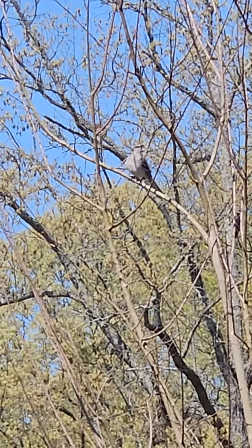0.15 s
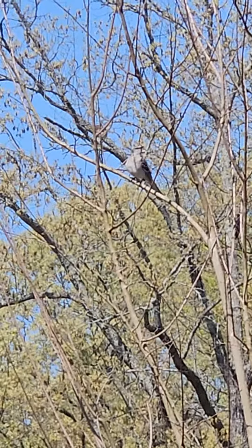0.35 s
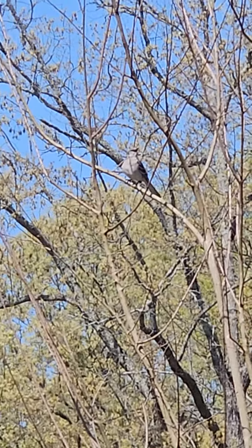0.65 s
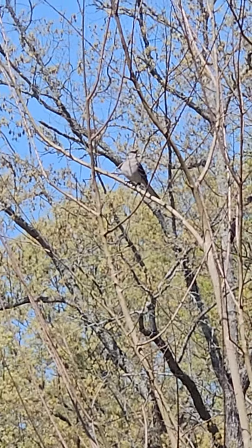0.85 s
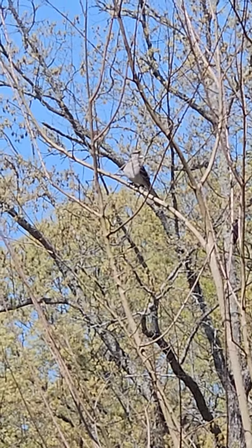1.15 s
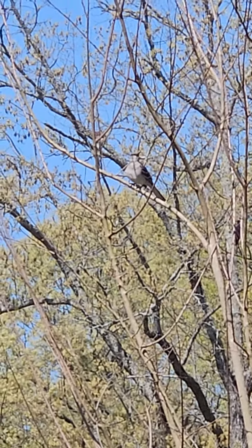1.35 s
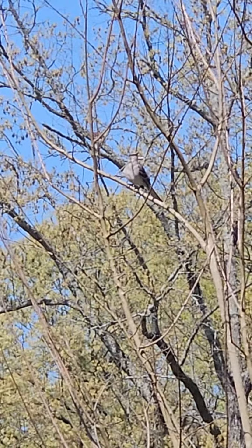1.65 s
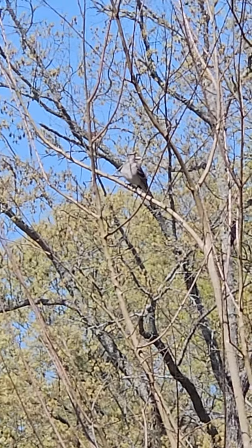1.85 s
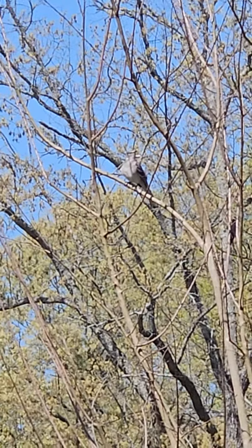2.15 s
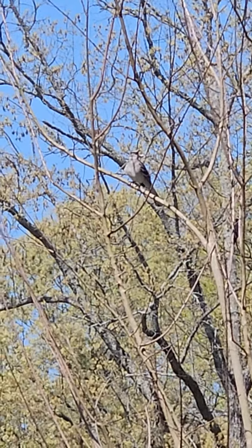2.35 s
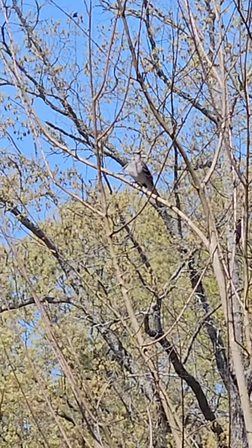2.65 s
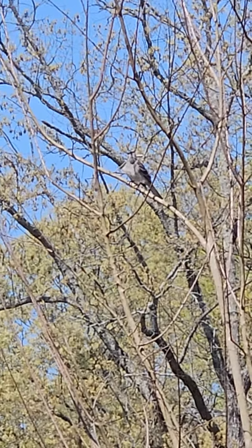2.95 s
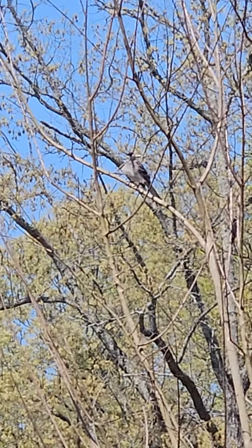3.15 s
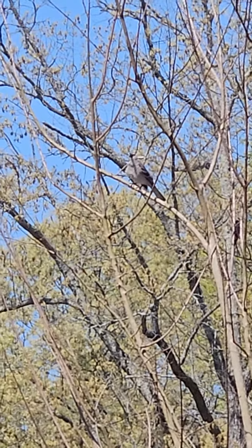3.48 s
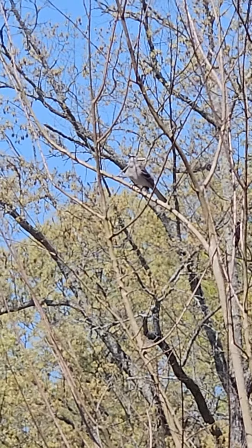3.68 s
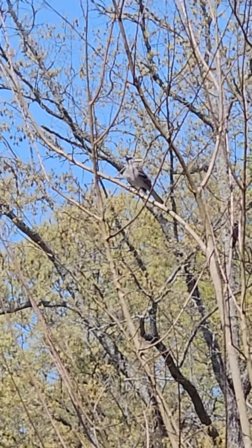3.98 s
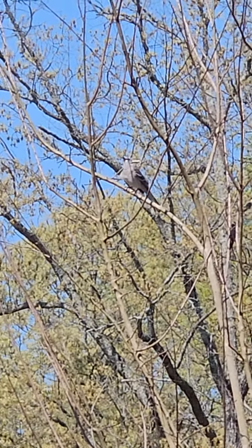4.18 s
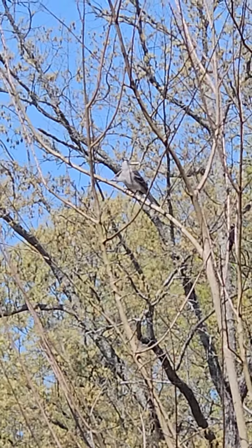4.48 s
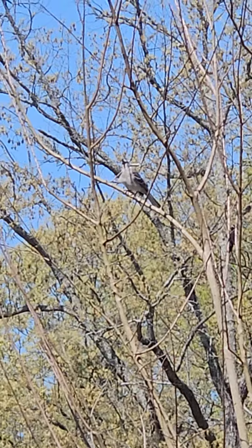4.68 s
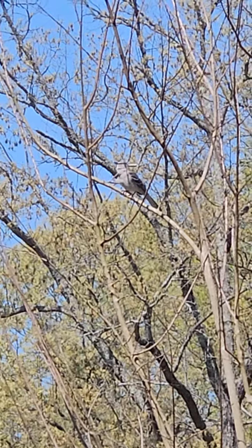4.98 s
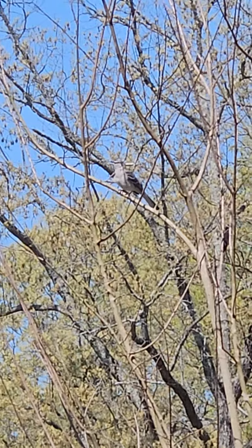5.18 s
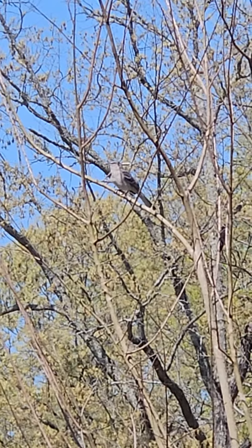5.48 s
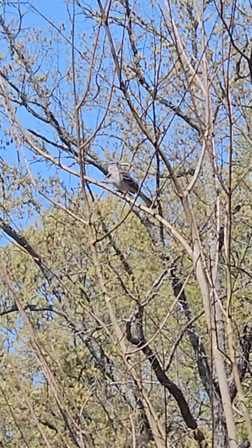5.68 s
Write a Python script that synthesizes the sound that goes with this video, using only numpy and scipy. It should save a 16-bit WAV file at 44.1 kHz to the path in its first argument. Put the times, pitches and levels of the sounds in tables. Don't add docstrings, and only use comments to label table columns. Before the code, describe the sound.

Open woodland, stereo handheld microphone. Quiet road rumble, thin air hiss and a weak wavering machine hum lie under one prominent bird. It gives warbled descending trills separated by pauses and small low two-step notes, then alternates low quavering chirps with sharp high whistles that plunge and settle. Faint distant bird notes and tiny rustles appear. In the second half, low wind buffets hit left and right separately.

```python
import sys
import numpy as np
from scipy import signal
from scipy.fft import rfft, irfft, next_fast_len
from scipy.io import wavfile
from scipy.ndimage import uniform_filter1d, map_coordinates

SR = 44100
rng = np.random.default_rng(int(sys.argv[2]) if len(sys.argv) > 2 else 0)


def unload_audio(sound):
    columns = np.transpose(np.atleast_2d(sound))
    steps = np.round(np.clip(columns, -1, 1) * 32767)
    wavfile.write(sys.argv[1], SR, steps.astype(np.int16))


def field_ratio(decibels):
    return 10 ** (np.asarray(decibels, dtype=float) / 20)


N = 257103


def unit(x):
    return x / np.sqrt(np.mean(x ** 2) + 1e-20)


def along(points, hz):
    f, v = np.transpose(points)
    return np.interp(np.log(hz + 1), np.log(f + 1), v)


def wobble(rate, size=N):
    knots = rng.standard_normal(int(size * rate / SR) + 4)
    return map_coordinates(knots, [np.arange(size) * rate / SR])


def swells(rows, rise_db_per_s, fall_db_per_s):
    s, hold, db = np.transpose(rows)[..., None]
    t = np.arange(N) / SR
    rise_db = rise_db_per_s * np.clip(s - t, 0, 1)
    fall_db = fall_db_per_s * np.clip(t - s - hold, 0, 1)
    return field_ratio(db - rise_db - fall_db)


def rush(spectrum, alike, patchy_db):
    z = signal.stft(rng.standard_normal((2, N)), nperseg=512)[2]
    field = uniform_filter1d(rng.standard_normal(z.shape[1:]), 6, 0)
    field = uniform_filter1d(field, 14, 1)
    pair = signal.istft(z * field_ratio(patchy_db * unit(field)), nperseg=512)[1][:, :N]
    m = next_fast_len(N + 8192)
    hz = np.fft.rfftfreq(m, 1 / SR)
    turn = np.arccos(np.clip(along(alike, hz), -1, 1)) / 2
    weights = np.array([np.cos(turn), np.sin(turn)])
    mid, side = irfft(rfft(pair, m) * field_ratio(along(spectrum, hz)) * weights, m)[:, :N]
    return unit(np.array([mid + side, mid - side]))


# freq_hz, likeness (-1 to 1); the air hiss shares it
LIKENESS = [(60, 0.6), (180, 1), (550, 0.34), (1650, 0.35), (4970, -0.29), (15000, 1)]
# freq_hz, density_db (per Hz)
TYRES = [(88, -11.5), (150, 0), (194, -23), (246, -4), (274, -5), (318, -4.5), (808, -13.5), (1600, -21),
         (2080, -64.5), (3520, -120)]
# freq_hz, density_db (per Hz)
ENGINES = [(12, -25), (20, -18.5), (76, -4), (173, -19), (199, -26.5), (230, -20.5), (300, -43.5),
           (510, -120)]
# start_s, hold_s, level_db
PASSING = [
    (0.0, 3.2, -45.5),
    (.55, 0.053, -42),
    (3.03, 0.18, -41.5),
]


def traffic():
    tyres = field_ratio(-54 - 0.55 * wobble(4.7)) * rush(TYRES, LIKENESS, patchy_db=2.0)
    nearer = swells(PASSING, rise_db_per_s=48, fall_db_per_s=48).max(0)
    level = np.maximum(field_ratio(-45.5), nearer) * field_ratio(1.5 * wobble(7.5))
    return tyres + level * rush(ENGINES, [(50, 0.88)], patchy_db=-0.6)


# start_s, hold_s, level_db
HUM = [(0.0, 0.066, -53), (.3, 0.1, -55), (.65, 0.22, -58.5), (1.05, 0.23, -54.5), (1.55, 0.29, -55.5),
       (2.55, 0.3, -58.5), (3.15, 0.66, -54), (3.9, 0.19, -55), (4.3, 0.19, -46.5), (4.62, 0.15, -53),
       (5.0, 0.075, -57), (5.32, 0.38, -51)]


def machine_hum():
    level = field_ratio(-71.5) + swells(HUM, rise_db_per_s=153, fall_db_per_s=153).sum(0)
    phase = 2 * np.pi * np.cumsum(250 + 2.67 * wobble(18)) / SR
    return level * np.sin(phase) * field_ratio([[-1.5], [1.5]])


# freq_hz, density_db (per Hz)
AIR = [(710, -47), (1200, -28.5), (1690, -14), (2500, 2.5), (5860, -21.5), (8450, -12.5), (9310, -22),
       (9620, -58), (11500, -24.5), (15800, -32)]


def air_hiss():
    return field_ratio(-59) * rush(AIR, LIKENESS, patchy_db=1.5)


# freq_hz, density_db (per Hz)
EARLIER = [(880, -62), (1500, -17), (1590, -16.5), (1890, 4.5), (2620, 5.5), (2750, 11), (2950, -61),
           (3300, -37), (4290, -51), (7260, -120)]


def earlier_phrase():
    t = np.arange(N) / SR
    return field_ratio(-41.0 - 60 * t / 1.05) * rush(EARLIER, [(2000, 0.28)], patchy_db=1.0)


# pitch_hz, level_db, middle_s, half_length_s
INSECTS = [
    (4880, -78.5, 0.4, 0.5),
    (5100, -77, 0.57, 0.068),
    (3160, -74, .29, 0.062),
    (9180, -73.5, 0.063, 0.13),
]


def insects():
    t = np.arange(N) / SR
    total = np.zeros(N)
    for hz, db, middle, half in INSECTS:
        level_db = db + 5.5 + 3 * wobble(12.0) - 9 * ((t - middle) / half) ** 4
        total += field_ratio(level_db) * np.sin(2 * np.pi * hz * t + 0.89 * wobble(40))
    return total


# middle_s, half_length_s, level_db, centre_hz, band_ratio
STIRS = [
    (0.28, 0.027, -63.5, 8350, 3.6),
    (2.23, 0.046, -63, 8000, 2),
    (4.725, 0.13, -54, 1603, 1.33),
    (1.149, 0.24, -53.5, 808, 1.36),
    (1.85, 0.09, -55.5, 782, 1.26),
    (3.933, 0.053, -54, 762, 3.3),
]


def stirs():
    t = np.arange(N) / SR
    total = np.zeros((2, N))
    for middle, half, db, hz, ratio in STIRS:
        band = [(hz / ratio ** 2, -120), (hz / ratio, -25), (hz, 0), (hz * ratio, -25), (hz * ratio ** 2, -120)]
        swell = field_ratio(db) * np.exp(-((t - middle) / half) ** 4)
        total += swell * rush(band, [(hz, .2)], patchy_db=-2.0)
    return total


def add(track, start_s, sound):
    part = track[:, max(round(start_s * SR), 0):][:, :sound.shape[1]]
    part += sound[:, :part.shape[1]]


# freq_hz, density_db (per Hz)
RASP = [(2000, -16), (3500, 5.5), (4700, 7.5), (5900, -9.5), (7000, -6.5), (9000, 2.5), (10000, -60),
        (12000, -6), (14500, -12), (15900, -31.5)]


def sing(track, rows, overtones_db, warble=((0, 0), (6, 360)), rasp_db=-45, glide=0.0011, swing=0.0524,
         jitter=0.0077, edge=0.0017, onset=0, grain_db=1.0, smear=0.15, clear_db_per_s=0, late_db=0,
         late_s=.03, puff_db=-80, dip=0):
    s, *cols = np.transpose(rows)
    t = np.arange(s[0], s[-1], 1 / SR)
    size = len(t)
    age = t - t[0]
    hz, db, pan_db, depth = [np.interp(t, s, c) for c in cols]
    hz = uniform_filter1d(hz, round(glide * SR) + 1, mode="nearest")

    turn = 2 * np.pi * np.interp(t, *np.transpose(warble)) - 0.3 + 0.13 * wobble(31.4, size)
    depth = np.clip(depth, 0, 1) * np.clip((age - .004) / .012, 0, 1)
    shut = (1 - np.cos(turn + .5 * np.cos(turn))) / 2
    leap = (1 - np.cos(turn - 0.3)) / 2
    snap = onset * np.exp(-age / .003)
    bend = swing * depth * leap ** 2.9 - dip * depth * np.sin(turn)
    pitch = hz * (1 + bend + snap + jitter * wobble(148.36, size))
    phase = 2 * np.pi * np.cumsum(pitch) / SR

    tone = (1 - .93 * depth * shut) * np.sin(phase)
    for k, over_db in enumerate(overtones_db, 2):
        late = late_db * (k - 2.5) * np.exp(-age / late_s)
        level = field_ratio(over_db - late + grain_db * wobble(251.2, size)) * (1 - 0.88 * depth * shut)
        partial = np.sin(k * phase + smear * k * wobble(400, size))
        tone += level * partial * (k * pitch < 15900)
    tone *= field_ratio(depth * (2.32 * wobble(199.3, size) + 1.17 * wobble(44.9, size)))

    rasp = field_ratio(along(RASP, np.fft.rfftfreq(size, 1 / SR)))
    air = unit(irfft(rfft(rng.standard_normal(size)) * rasp, size))
    spit = 1 - .6 * depth + 1.6 * depth * shut ** 2
    breath = field_ratio(rasp_db - clear_db_per_s * age) + field_ratio(puff_db - 500 * age)
    voice = np.sqrt(2) * tone + breath * spit * air
    fade = np.clip(np.minimum(age, t[-1] - t) / edge, 0, 1)
    add(track, s[0], voice * field_ratio(db) * fade * field_ratio([pan_db / 2, -pan_db / 2]))


def stamped(shape, start_s, scale, db, pan_db):
    return [(start_s + s, scale * hz, db + rel_db, pan_db, 0) for s, hz, rel_db in shape]


# start_s, length_s, from_hz, to_hz, level_db
FAR = [(2.11, .06, 4700, 4120, -64), (2.2, .13, 3760, 3610, -61), (4.605, .045, 5100, 3900, -61),
       (1.98, .14, 3560, 3340, -60), (3.56, .11, 2280, 2000, -58), (.335, .05, 2050, 1900, -63),
       (.39, .065, 2050, 2320, -63), (.455, .04, 1900, 1860, -61), (1.86, .2, 3960, 3880, -67),
       (.12, .07, 2150, 2320, -61), (4.22, .14, 2850, 2700, -58)]


def far_bird():
    song = np.zeros((2, N))
    for s, length, from_hz, to_hz, db in FAR:
        glide = [(0, from_hz, 0), (length, to_hz, 0)]
        sing(song, stamped(glide, s, 0.98, db, -1), [], edge=0.0094)
    return song


def swaying():
    slow = np.array([wobble(25), wobble(25)])
    quick = np.array([wobble(90), wobble(90)])
    return field_ratio(2.6 * slow + 1.5 * quick)


# freq_hz, t60_s
WOOD = [(1000, 0.98), (2500, 2.49), (4000, 1.34), (8000, 0.98), (15000, 0.18)]


def wood(x, build=0.028):
    hz, t, z = signal.stft(rng.standard_normal((2, 2 * SR)), SR, nperseg=256)
    shape = field_ratio(-60 * t / along(WOOD, hz)[:, None]) + 4.53 * field_ratio(-60 * t / 0.34)
    tail = signal.istft(z * shape * (1 - np.exp(-t / build)), SR, nperseg=256)[1]
    tail /= np.linalg.norm(tail[0])
    return swaying() * signal.fftconvolve(x.mean(0)[None], tail, axes=1)[:, :N]


# start_s, pitch_hz, level_db, left_minus_right_db
TRILLS = [
    [(.571, 4220, -30.5, -2), (.595, 4074, -22.5, 1), (.615, 3850, -16.5, -7), (.66, 3620, -16, 1),
     (.70, 3423, -24.5, -3), (.775, 3260, -20.5, 1), (.85, 3150, -22.5, -1.5), (.94, 3114, -23.5, 0),
     (.965, 3370, -37.5, -10.5)],
    [(1.352, 4160, -34, 3), (1.372, 3900, -20.5, -7), (1.39, 3684, -12, 0), (1.505, 3500, -13.5, 1.5),
     (1.55, 3403, -22.5, -6.5), (1.595, 3180, -15, 2.5), (1.685, 3097, -24, -1), (1.703, 2984, -20, 4),
     (1.73, 3010, -38.5, -8)],
    [(2.346, 4260, -41, -7), (2.365, 3980, -17.5, -4.5), (2.40, 3603, -17.5, -2), (2.452, 3550, -13.5, -2),
     (2.47, 3434, -22.5, -3), (2.54, 3264, -19, 1), (2.66, 3025, -19, -2.5), (2.725, 2949, -18, 0),
     (2.815, 3153, -28.5, -2)],
    [(3.234, 4140, -31.5, 7.5), (3.255, 4214, -16, -3), (3.275, 3884, -17, -11), (3.30, 3614, -13, -0.5),
     (3.345, 3542, -12.5, 3), (3.38, 3430, -17.5, -2), (3.412, 3270, -16, 0), (3.555, 2954, -20, 1.5),
     (3.595, 2863, -25, -6)],
]
# start_s, swells_so_far
WARBLE = [
    [(.565, -2), (.597, 0), (.757, 10), (.865, 16), (.97, 22)],
    [(1.351, -2), (1.388, 0), (1.53, 8), (1.703, 18), (1.738, 20)],
    [(2.346, -1), (2.674, 18), (2.743, 22), (2.782, 24), (2.826, 26)],
    [(3.232, -1), (3.25, 0), (3.273, 1), (3.41, 9), (3.558, 18), (3.611, 21)],
]
TRILL_AIR_DB = [-32, -43, -31, -41]
TRILL_VOICE = [-19.5, -33, -30.5]


def trills(song):
    for rows, warble, air_db in zip(TRILLS, WARBLE, TRILL_AIR_DB):
        sing(song, [(*row, .97) for row in rows], TRILL_VOICE, warble, rasp_db=air_db, puff_db=-20.5,
             dip=0.027, swing=.12, onset=0.052, jitter=0.01, glide=0.0048, edge=0.0021, smear=0.55)


# freq_hz, level_db
TWIGS = [(1500, -16), (2500, -14), (3200, -9), (8000, -7), (15000, -6)]


def trunks(x, spread=0.0076):
    t = np.arange(SR // 8) / SR
    answer = rng.standard_normal((2, len(t))) * np.exp(-t / (2 * spread)) * np.clip(t / 0.011, 0, 1)
    answer /= np.linalg.norm(answer[0])
    m = next_fast_len(N + SR)
    scatter = field_ratio(along(TWIGS, np.fft.rfftfreq(m, 1 / SR)))
    return irfft(rfft(x, m) * rfft(answer, m) * scatter, m)[:, :N]


# freq_hz, left_lead_rad
PORTS = [(0, -5.5), (3100, 1.57), (3700, 0.87), (4820, 2), (5250, -7.5), (6120, 10.5), (7750, 7.5),
         (8870, 14.5), (9130, -2), (9560, 1), (10900, 9), (12800, 16), (13900, 17), (15500, 16)]


def ports(x):
    m = next_fast_len(N + 8192)
    lead = along(PORTS, np.fft.rfftfreq(m, 1 / SR))
    return irfft(rfft(x, m) * np.exp(.5j * np.array([lead, -lead])), m)[:, :N]


# freq_hz, gain_db, left_minus_right_db
BOUNCE = [(1705, 5, -1), (1817, 3, -7), (1930, 4.5, 0), (2176, 3, -7), (2200, 0.5, -13.5),
          (2600, 3, 7.5),
          (3000, -2, -1.5), (3250, -1.5, 1.5), (3420, -4, -3), (3550, 2, 3), (3900, 2, -12),
               (4080, -9, -5), (4270, 1, 4), (4640, 2, -11)]


def heard(s, hz, db, depth):
    bounce = np.array(BOUNCE)
    gain_db = along(bounce[:, :2], hz)
    pan_db = along(bounce[:, ::2], hz)
    return np.transpose([s, hz, db + gain_db, pan_db, depth + 0 * s])


# start_s, pitch_hz, level_db
STEPS = [
    [(1.006, 2386, -53), (1.022, 2368, -28.5), (1.042, 2338, -27), (1.074, 2327, -22.5),
     (1.081, 2166, -46.5), (1.088, 2180, -38), (1.112, 2380, -40), (1.122, 2300, -47)],
    [(1.114, 2020, -58), (1.122, 1909, -36), (1.134, 1834, -36.5), (1.153, 1810, -27.5),
     (1.18, 1833, -27.5), (1.194, 1780, -41)],
    [(2.87, 2284, -51), (2.879, 2330, -39.5), (2.889, 2408, -26.5), (2.927, 2342, -23.5),
     (2.943, 2309, -28.5), (2.953, 2427, -20.5), (2.962, 2340, -55.5), (2.972, 2285, -33.5),
     (2.98, 2400, -46)],
    [(2.978, 2260, -46), (2.983, 2130, -35.5), (2.991, 1930, -29), (3.012, 1888, -36.5),
     (3.034, 1864, -30.5), (3.05, 1885, -32)],
]
UPPER_VOICE = [-25, -27, -43.5, -48, -51, -34]
LOWER_VOICE = [-16.5, -33.5, -30, -47, -33, -34]


def two_steps(song):
    for rows, voice in zip(STEPS, 2 * [UPPER_VOICE, LOWER_VOICE]):
        s, hz, db = np.transpose(rows)
        sing(song, heard(s, hz, db, .1), voice, rasp_db=-40.0, glide=0.0027, jitter=0.0045,
             smear=0.069, edge=0.0018)


# start_s, from_hz, to_hz, level_db
SAGS = [
    (1.198, 1958, 1494, -30),
    (3.051, 1836, 1684, -26),
    (3.919, 1795, 1645, -34),
    (4.236, 3800, 3520, -17.5),
    (4.531, 1840, 1667, -29.5),
    (5.191, 1850, 1687, -30.5),
    (5.515, 3950, 3460, -29.5),
]
LOW_VOICE = [-15.5, -30.5, -30, -57.5, -33.5, -31.5]


def sags(song):
    for s, from_hz, to_hz, db in SAGS:
        voice = LOW_VOICE[:2] if from_hz < 3000 else [-34]
        fall = [(0, from_hz, 0.5), (.02, to_hz, -14.5)]
        sing(song, stamped(fall, s, 1, db, -2), voice, edge=.005)


# start_s, hold_s, buffet_db, left_minus_right_db, sharpness_db
GUSTS = [(3.595, 0.065, -32.5, -2, -32), (3.737, 0.067, -12.5, -22, -16.5), (3.868, 0.04, -16.5, 12, -25),
         (3.966, 0.15, -20.5, 18, -9), (4.202, 0.011, -11, -5.5, -6), (4.228, 0.026, -24, -1, 0.5),
         (4.247, .015, -23, 4, -8), (4.32, 0.003, -16, -12, -7), (4.408, 0.0078, -13.5, -8, -24.5),
         (4.574, 0.027, -32.5, 10, -9), (4.647, 0.036, -29.5, -23, -21), (4.91, 0.11, -38, -10, -16),
         (5.057, 0.15, -42, 2, -5.5), (5.31, 0.014, -21.5, 29, -21), (5.338, 0.067, -37.5, 10, -6),
         (5.51, 0.013, -40, -6, -14)]
# freq_hz, density_db (per Hz)
BUFFET = [(47, -41), (80, 0), (139, -4.5), (227, -18.5), (413, -47), (500, -65.5), (650, -87.5),
          (1100, -120)]
# freq_hz, likeness (-1 to 1)
GUST_ALIKE = [(50, -.1)]


def wind():
    *_, pan_db, sharp_db = np.transpose(GUSTS)
    power = swells(np.array(GUSTS)[:, :3], rise_db_per_s=352, fall_db_per_s=298.5) ** 2
    ratio = field_ratio([pan_db, -pan_db]) ** 2
    share = ratio / (1 + ratio)
    lumps = field_ratio(2.8 * np.array([wobble(16), wobble(22)]))
    thud = [(15, -33.5), (30, -17.5), (55, -9.5), (90, -19.0), (130, -50), (300, -120)]
    deep = rush(thud, GUST_ALIKE, patchy_db=0.0)
    sharp = rush(BUFFET, GUST_ALIKE, patchy_db=4.0)
    deep_level = 0.68 * np.sqrt(share @ power)
    sharp_level = np.sqrt(share * field_ratio(2 * sharp_db + 2.5) @ power)
    return lumps * (deep_level * deep + sharp_level * sharp)


# start_s, level_db
PICKUPS = [
    (3.759, -55),
    (4.374, -53),
    (5.03, -55),
    (5.693, -57.5),
]
# after_start_s, pitch_hz, level_db
PICKUP = [(0, 1260, -3), (.016, 1428, 11.5), (.022, 1600, 5), (.027, 1940, 22.5)]
CROAK_VOICE = [1, -50, -27]


def pickups(song):
    for s, db in PICKUPS:
        sing(song, stamped(PICKUP, s, 1, db, -2), CROAK_VOICE, rasp_db=-29.5, jitter=0.024)


def moments(start, end):
    return np.arange(start, end, .001)


def envelope(t, length, attack, start_db, fade_db_per_s, release, end_db):
    rise_db = start_db * np.clip(1 - t / attack, 0, 1)
    return rise_db + fade_db_per_s * t + end_db * np.clip((t - length) / release, 0, 1)


# start_s, length_s, pitch_hz, level_db, scoop_hz (from below)
ARCHES = [
    (3.782, 0.12, 2221, -28, 116.8),
    (4.403, 0.12, 2213, -27, 253),
    (5.055, 0.1114, 2162, -25.5, 30.5),
    (5.722, 0.14, 2140, -27.5, 221),
]
# attack_s, start_db, fade_db_per_s, release_s, end_db
ARCH_SHAPE = (.012, -4, -12, .035, -18)
ARCH_BRIGHT_DB = [2, 0.5, -9, -5.5]
ARCH_DEPTH = [.6, .75, .8, .75]
ARCH_SWELLS_PER_S = [62, 60, 58, 36]


def arches(song):
    scoop_s, sag_hz_per_s = 0.0141, 2300
    release_s = ARCH_SHAPE[3]
    settings = zip(ARCHES, ARCH_BRIGHT_DB, ARCH_DEPTH, ARCH_SWELLS_PER_S)
    for (s, length, hz, db, scoop_hz), bright_db, depth, rate in settings:
        t = moments(0, length + release_s)
        pitch = hz - scoop_hz * np.exp(-t / scoop_s) - sag_hz_per_s * np.minimum(t, length)
        level_db = db + envelope(t, length, *ARCH_SHAPE)
        sing(song, heard(s + t, pitch, level_db, depth), np.add(LOW_VOICE, bright_db),
             warble=[(s, 0), (s + 1, rate)], swing=0.0253, rasp_db=-37.5, late_db=2, late_s=0.027,
             jitter=0.01, smear=.33, edge=0.0033)


# start_s, pitch_scale, level_db, left_minus_right_db, top_hz
FLICKS = [
    (4.034, 1.1, -19, 1, 6660),
    (4.665, 1.024, -15, 0, 6840),
    (5.286, 1.03, -20, -1.5, 6370),
]
# after_start_s, pitch_hz, level_db
FLICK = [(0, 2850, -11.5), (.008, 3188, -11.5), (.015, 4000, -2.5), (.019, 5090, -21)]
# after_start_s, share_of_top_pitch, level_db
CREST = [(.023, .94, -7.5), (.027, 1, 0.5), (.033, .97, 0)]
FLICK_TOP_DB = [-15, -12.5, -22]
FLICK_VOICE = [-16.5, -47]


def flicks(song):
    for (s, scale, db, pan_db, top_hz), top_db in zip(FLICKS, FLICK_TOP_DB):
        rise = stamped(FLICK, s, scale, db, pan_db)
        top = stamped(CREST, s, top_hz, db + top_db, pan_db)
        sing(song, rise + top, FLICK_VOICE, rasp_db=-12.5, jitter=0.023)


def before(t, moment, width):
    return (1 - np.tanh((t - moment) / width)) / 2


# start_s (fall passes 4720 Hz), final_hz, slow_fall_hz, ledge_hz, ledge_end_s (after start)
WHISTLES = [
    (4.078, 3841, 117.7, 205.4, .028),
    (4.711, 3597, 371, 113.4, .05),
    (5.339, 3867, 242, 166, 0.061),
]
# start_s, level_db
EFFORT = [
    [(4.078, -18), (4.09, -13), (4.102, -17.5), (4.117, -13), (4.137, -24.5), (4.18, -18), (4.205, -18),
     (4.232, -24), (4.248, -38)],
    [(4.709, -19), (4.725, -11.5), (4.74, -12), (4.755, -20.5), (4.78, -24.5), (4.803, -19), (4.82, -24),
     (4.864, -22.5), (4.895, -42.5)],
    [(5.339, -19.5), (5.355, -13.5), (5.375, -17), (5.39, -12), (5.41, -16), (5.443, -33.5), (5.461, -23),
     (5.51, -33.5), (5.533, -50.5)],
]
WHISTLE_VOICES = [
    [-34.5, -32, -38],
    [-28.5, -35.5, -40.5],
    [-31, -35, -39],
]


def whistles(song):
    loud_hz, plunge_s, settle_s, lead_s, lead_db = 4720, 0.01, 0.0438, .014, -23.5
    for whistle, effort, voice in zip(WHISTLES, EFFORT, WHISTLE_VOICES):
        s, end_hz, slow_hz, ledge_hz, ledge_s = whistle
        when, db = np.transpose(effort)
        t = moments(-lead_s, when[-1] - s)
        settling = slow_hz * np.exp(-t / settle_s)
        plunge = (loud_hz - end_hz - slow_hz - ledge_hz) * np.exp(-t / plunge_s)
        ledge = ledge_hz * before(t, ledge_s, width=0.0093)
        level_db = np.interp(s + t, when, db) + lead_db * np.clip(-t / lead_s, 0, 1)
        sing(song, heard(s + t, end_hz + settling + plunge + ledge, level_db, 0), voice, rasp_db=-14,
             clear_db_per_s=323, late_db=16, late_s=0.04, glide=.0027, smear=.07, jitter=.002)


def mockingbird():
    song = np.zeros((2, N))
    for part in (trills, two_steps, sags, pickups, arches, flicks, whistles):
        part(song)
    return song


def surroundings():
    return traffic() + machine_hum() + air_hiss() + earlier_phrase() + insects() + stirs()


def scene():
    background = surroundings()
    far, bird = far_bird(), mockingbird()
    echoes = trunks(bird) + field_ratio([[-15.5], [-13.5]]) * wood(bird)
    return field_ratio(-0.85) * ports(bird) + echoes + far + wood(far) + wind() + background


def low_pass(x):
    return signal.sosfilt(signal.butter(12, 15940, fs=SR, output="sos"), x)


def record(dry):
    bass_cut = signal.butter(2, 28, "high", fs=SR, output="sos")
    sound = signal.sosfilt(bass_cut, dry)
    ceiling = .9
    sound = sound / (1 + np.abs(sound / ceiling) ** 6) ** (1 / 6)
    return low_pass(sound)


dry = scene()
out = record(dry)
unload_audio(out)
```